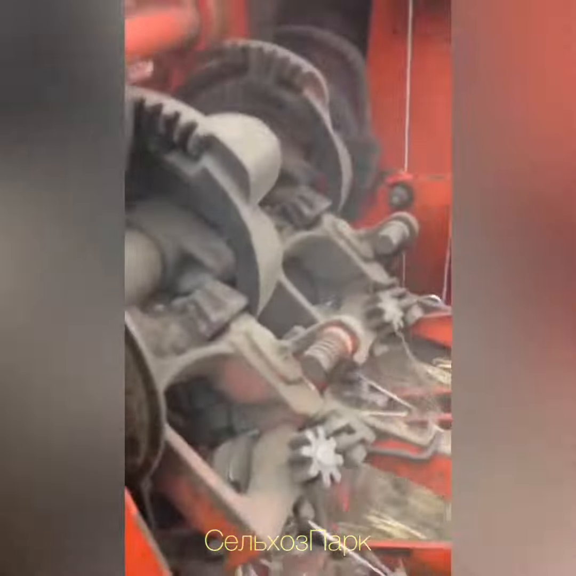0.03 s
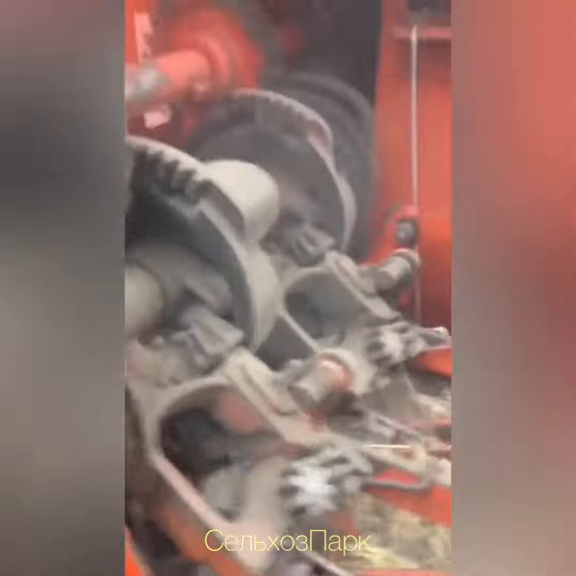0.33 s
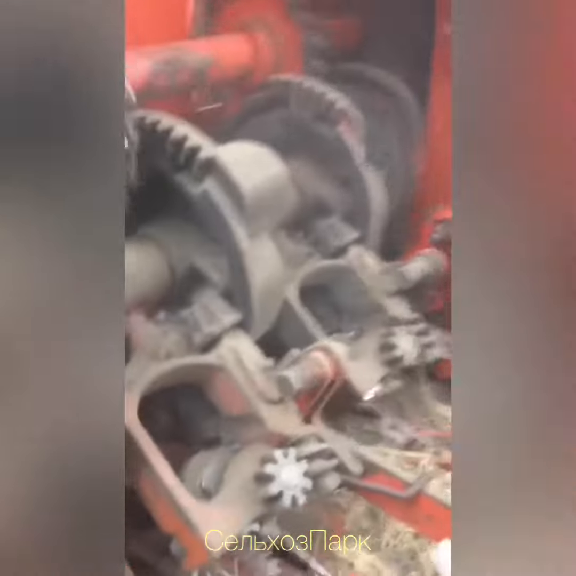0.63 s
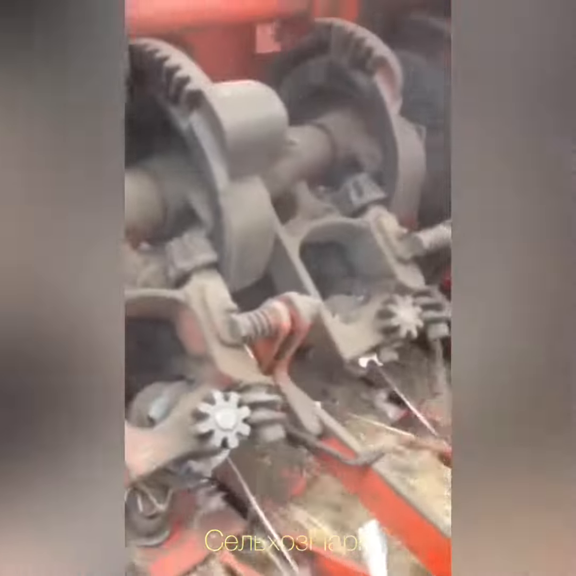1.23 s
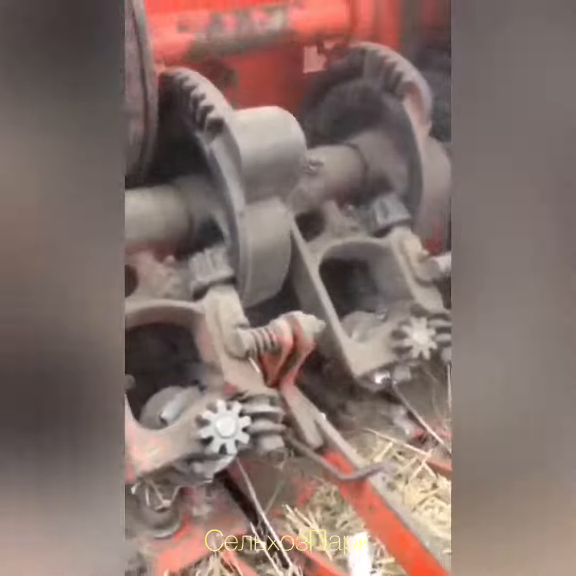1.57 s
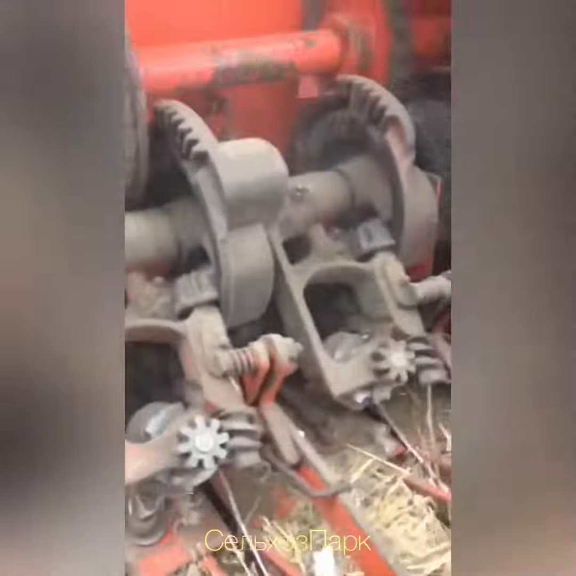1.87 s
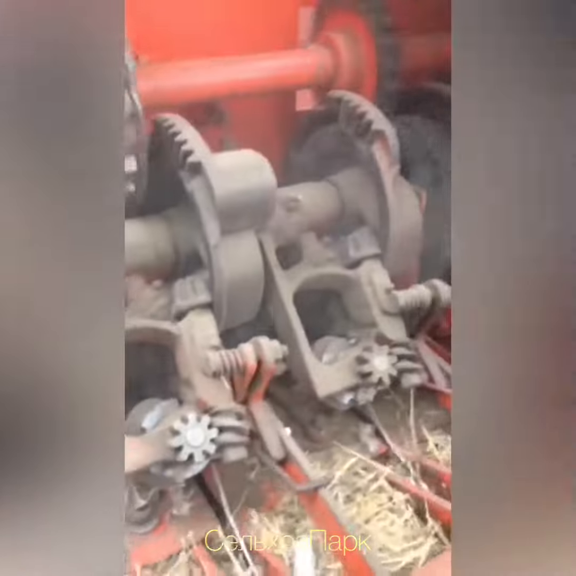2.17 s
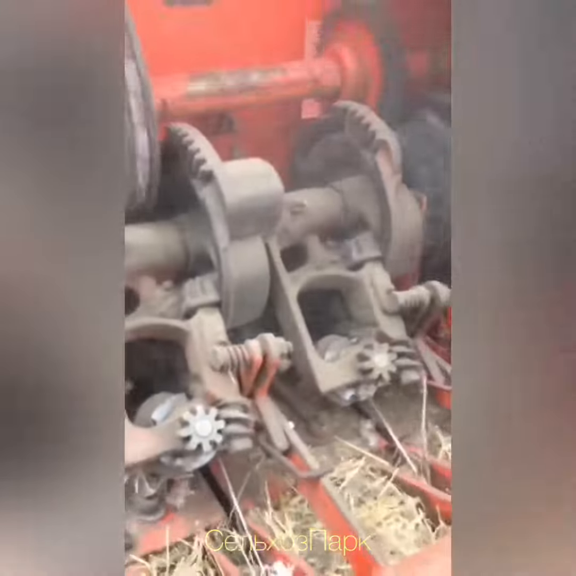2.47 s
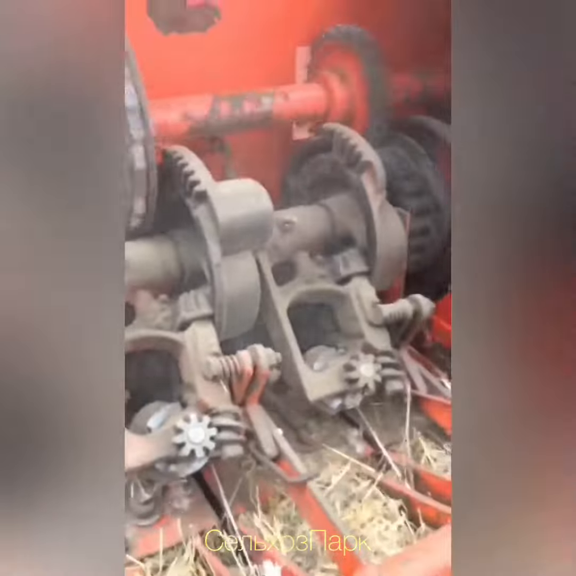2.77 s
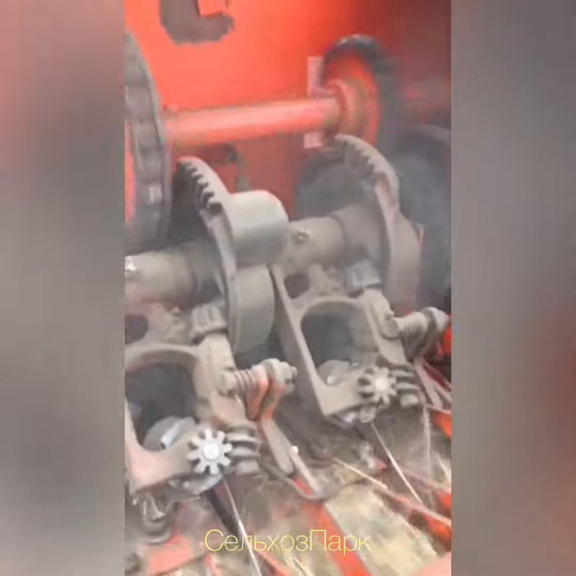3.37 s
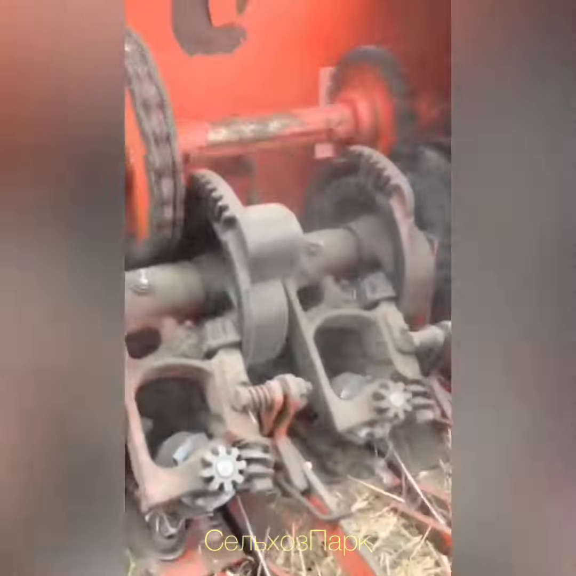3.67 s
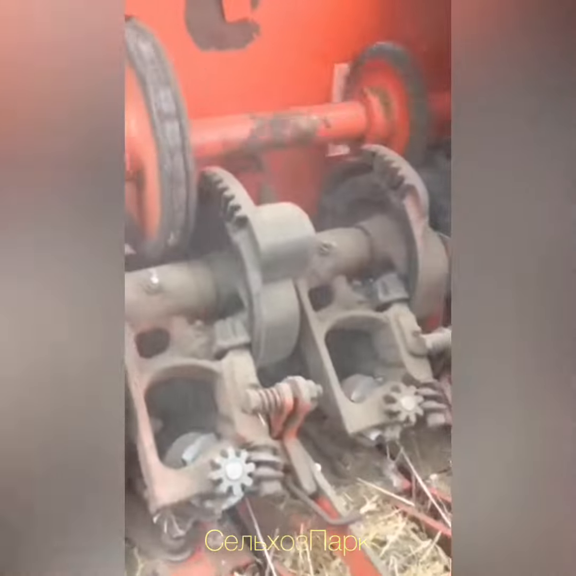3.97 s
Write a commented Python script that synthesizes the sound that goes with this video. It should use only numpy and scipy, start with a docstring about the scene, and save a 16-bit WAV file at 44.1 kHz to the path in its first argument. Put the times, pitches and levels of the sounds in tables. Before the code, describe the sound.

A hay baler runs steadily, with deep rhythmic thumping, rattling chains and sharp steel clacks.

```python
"""A hay baler running steadily in the open air, heard from one microphone close to its knotters.
Every turn of the crank brings two surges, the plunger's pressing stroke and its return: the sheet-steel
bale chamber booms and thumps, the frame rumbles, chains rattle and hay rustles over a deep shudder.
The plunger scrapes on its way back. Once a turn a steel part clacks home and chatters, the hardest
blows set an arm clanging, and now and then a small knotter part rings thinly."""
import sys
import numpy as np
from scipy import signal
from scipy.fft import rfft, irfft
from scipy.io import wavfile
from scipy.ndimage import uniform_filter1d

SR = 44100
rng = np.random.default_rng(int(sys.argv[2]) if len(sys.argv) > 2 else 0)


def unload_audio(sound):
    """Save the sound as a 16-bit wav file, at the path given as the first command line argument."""
    columns = np.transpose(np.atleast_2d(sound))
    # keep every value between -1 and 1, then stretch to whole-number steps
    steps = np.round(np.clip(columns, -1, 1) * 32767)
    wavfile.write(sys.argv[1], SR, steps.astype(np.int16))


N = 176400
T = np.arange(N) / SR
TURN_S, FIRST_TURN_S = 1.123, -.275
KNOCKS_PER_S, KNOCK_SPREAD_DB = 900, 2   # in both frame and chamber


def from_db(db):
    """Decibels to gain."""
    return 10 ** (np.asarray(db) / 20)


def rms_one(x):
    """Scale to rms 1."""
    return x / np.sqrt(np.mean(x ** 2) + 1e-20)


def colour(x, spectrum, tilt_db=0):
    """Shape a signal by a spectrum that falls away beyond its ends, tilted per octave; rms 1."""
    octave = np.log2(np.maximum(np.fft.rfftfreq(len(x), 1 / SR), 1))
    hz, db = np.transpose(spectrum)
    edges = np.log2(hz)
    inside = np.clip(octave, edges[0], edges[-1])
    gain = from_db(np.interp(octave, edges, db) + tilt_db * inside - 20 * abs(octave - inside))
    return rms_one(irfft(rfft(x) * gain, len(x)))


def drift(rate_hz):
    """A random wander, mostly slower than the rate; rms 1."""
    hz = np.fft.rfftfreq(N, 1 / SR)
    return rms_one(irfft(rfft(rng.standard_normal(N)) / (1 + (hz / rate_hz) ** 2) ** 2, N))


def steady(x, span_s):
    """Even out swells longer than the span."""
    window = max(int(span_s * SR), 2)
    return x / np.sqrt(uniform_filter1d(uniform_filter1d(x ** 2, window), window) + 1e-9)


def swells(rows, width_s):
    """Gain that rises and falls around each given moment."""
    return sum(from_db(db) / (1 + ((T - s) / width_s) ** 2) for s, db in rows)


def contacts(per_s, spread_db):
    """Random clicks of uneven size."""
    sizes = from_db(spread_db * np.minimum(rng.exponential(1, N), 4)) * rng.choice([-1, 1], N)
    return sizes * (rng.random(N) < per_s / SR)


def resonate(x, hz, width_hz):
    """Ring one resonance with a signal; rms 1."""
    r = np.exp(-np.pi * width_hz / SR)
    return rms_one(signal.lfilter([1, 0, -1], [1, -2 * r * np.cos(2 * np.pi * hz / SR), r * r], x + 1e-18))


def add(out, s, sound):
    """Mix a sound in at its time."""
    i = max(int(s * SR), 0)
    out[i:i + len(sound)] += sound[:N - i]


# The machine's effort, changing with the hay each stroke takes in: time_s, lift_db
EFFORT = [(0, 1.5), (.12, 1), (.3, 0), (.6, 1), (.76, 0), (1.0, 0), (1.3, 1.5), (1.62, 0), (1.85, -1),
          (2.1, -0.5), (2.33, -2), (2.55, -.5), (2.87, -0.7), (3.2, -1.5), (3.42, 2.5), (3.65, 0),
          (4, -0.5)]

def each_turn(rows):
    """A level curve in dB, repeated with every turn of the crank and lifted by the effort."""
    s, db = np.transpose(rows)
    return np.interp(T - FIRST_TURN_S, s, db, period=TURN_S) + np.interp(T, *np.transpose(EFFORT))


# Shudders of the whole machine: centre_s, level_db
SHUDDERS = [(.03, -22), (.31, -22.5), (.63, -24), (1.05, -28.5), (1.37, -24), (1.47, -21.5), (2.25, -28.5),
            (2.61, -22), (3.18, -27), (3.36, -23), (3.64, -26.5), (3.755, -19)]
# Their deep spectrum: freq_hz, relative_db
SHUDDER_SPECTRUM = [(20, -26), (35, -13), (55, -8), (80, 0), (105, 6), (135, -3), (200, -43)]

def shudder(floor_db=-33):
    """The whole machine shakes as the plunger's mass turns round."""
    gain = np.hypot(from_db(floor_db), swells(SHUDDERS, width_s=0.048))
    return gain * steady(colour(rng.standard_normal(N), SHUDDER_SPECTRUM), span_s=0.014)


# Rise and fall of the hay, faint under the machinery: time_s, relative_db
RUSTLE_LEVEL = [(0, -32.5), (.13, -42), (.21, -34.5), (.42, -37), (.79, -41.5), (.9, -38), (1.22, -37.5),
                (1.48, -37.5), (1.66, -41.5), (1.87, -45), (2.1, -37.5), (2.36, -42), (2.48, -44.5),
                (2.64, -37), (2.82, -43), (2.99, -39), (3.33, -35.5), (3.49, -40), (3.62, -42), (3.82, -35),
                (4, -40.5)]
# Spectrum of the dry stalks: freq_hz, relative_db
RUSTLE_SPECTRUM = [(2500, 3), (4500, 4), (6500, -1.5), (8500, -2.5), (10500, -9.5)]

def hay(gain_db=-3.5, tick_db=-10, flicker_db=2, load_share=0.19):
    """Dry stalks rustle as they are pushed through, and some tick against the steel."""
    load_db = each_turn(RATTLE_LEVEL)   # the hay partly follows the load on the chains
    level_db = np.interp(T, *np.transpose(RUSTLE_LEVEL)) + load_share * (load_db - load_db.mean())
    flicker = from_db(flicker_db * drift(rate_hz=36))
    rustle = flicker * colour(contacts(per_s=9000, spread_db=0.5), RUSTLE_SPECTRUM)
    ticks = sum(resonate(contacts(per_s=10, spread_db=-1), hz, width_hz=400) / hz
                for hz in np.geomspace(4000, 9500, 10))
    return from_db(gain_db + level_db) * (rustle + from_db(tick_db) * rms_one(ticks))


# Scrapes of the returning plunger: centre_s, level_db
SCRAPES = [(.485, -32), (1.47, -21.5), (2.66, -25.5), (3.724, -21)]
# Spectrum of their grit: freq_hz, relative_db
SCRAPE_SPECTRUM = [(500, -8), (1100, 6.5), (2000, -5.5), (2800, -2), (3400, -0.5), (4500, -15.5),
                   (10000, -27)]

def plunger_scrapes():
    """The plunger scrapes on each return stroke in a short gritty swell."""
    return swells(SCRAPES, width_s=0.013) * colour(contacts(per_s=5000, spread_db=2.0), SCRAPE_SPECTRUM)


# The chains' rattle through one turn: time_in_turn_s, relative_db
RATTLE_LEVEL = [(0.02, -25.5), (0.12, -26), (0.25, -27), (0.32, -30), (0.4, -34.5), (0.5, -28.5),
                (0.62, -24), (0.72, -26.5), (0.82, -32), (0.94, -31), (1.1, -33)]
# Spectrum of links and gear teeth: freq_hz, relative_db
RATTLE_SPECTRUM = [(600, -10), (950, 5), (1300, 1.5), (1700, -2.5), (2150, -3), (2490, -4.5), (2580, -16.5),
                   (2850, -7.5), (3300, -9), (3850, -11), (4400, -16.5), (7000, -22.5)]
# Notes of the loose guards and links: pitch_hz, relative_db
LOOSE_PARTS = [(1027, -6), (1250, -1), (1451, 2), (1540, -2), (1727, -3), (1822, 3), (2065, -1), (2296, 1),
               (2630, -1.5), (2490, 2), (2814, -2.5), (3250, -4), (3720, -7)]

def chains(link_db=-2, clink_db=-6.5, link_t60_s=0.028):
    """Chain links and gear teeth rattle with the load, and loose parts clink on their own notes."""
    hits = contacts(per_s=1900, spread_db=-0.5)
    energy_kept = from_db(-120 / (link_t60_s * SR))   # per sample
    energy = signal.lfilter([1], [1, -energy_kept], hits ** 2)
    links = colour(np.sqrt(energy) * rng.standard_normal(N), RATTLE_SPECTRUM)
    clinks = sum(from_db(db) * resonate(contacts(per_s=60, spread_db=3.5), hz, width_hz=40)
                 for hz, db in LOOSE_PARTS)
    rattle = from_db(link_db) * links + from_db(clink_db) * rms_one(clinks)
    return from_db(each_turn(RATTLE_LEVEL)) * rattle


# Thin pings of small knotter parts, close to the microphone: start_s, level_db, pitch_hz, t60_s
KNOTTER_PINGS = [(1.168, -28.5, 7378, .12), (1.174, -40, 10050, .08), (1.178, -31, 4705, .13),
                 (1.18, -36, 6169, .13), (1.183, -30.5, 8231, .11), (1.188, -32, 7480, .09),
                 (1.304, -30, 8620, .07), (2.27, -31, 4800, .08), (3.381, -35, 8260, .07)]
# Clangs of one steel arm under the hardest clacks: start_s, level_db, pitch_hz, t60_s
ARM_CLANGS = [(1.029, -14, 2365, .07), (1.041, -14.5, 1583, .11), (2.146, -19, 1954, .1),
              (3.259, -17, 2450, .09), (3.274, -14, 2405, .1), (3.276, -20, 1620, .16)]

def steel_rings(rows, attack_s=.004, chatter_db=2.5):
    """Steel parts ring briefly on one note and chatter as they do."""
    out, t = np.zeros(N), T[:SR // 4]
    for s, db, hz, t60 in rows:
        envelope = np.minimum(t / attack_s, 1) * from_db(db - 60 * t / t60)
        add(out, s, envelope * np.sin(2 * np.pi * hz * t))
    return out * from_db(chatter_db * drift(rate_hz=720))


# Steel clacking home, at close range: start_s, level_db, brightness_db_per_octave, burst_t60_s
CLACKS = [(0.066, -29.5, 6, 0.077), (.133, -31.5, -9, 0.04), (0.197, -25, -5.5, 0.049),
          (0.522, -26, -5.5, 0.06), (0.606, -28.5, 1, 0.094), (0.855, -29, 0.5, 0.11),
          (0.871, -30, 1.5, 0.23), (1.014, -18, 4, 0.03), (1.027, -18, -2.5, 0.06),
          (1.044, -22.5, -1, 0.16), (1.1093, -26, -3.5, .1), (1.1706, -33.5, 6, 0.13),
          (1.292, -24.5, -9, 0.082), (1.3068, -27, -3, 0.12), (1.9802, -31, 1, 0.074),
          (2.124, -27, 3, 0.037), (2.1314, -17.5, -0.5, 0.064), (2.149, -20, -1.5, 0.059),
          (2.233, -23, -5, 0.17), (2.2677, -30, 1.5, 0.13), (2.413, -20, -4.5, 0.056),
          (2.922, -33, -7, 0.18), (2.998, -29, -1.5, 0.15), (3.25, -26, -1, .08), (3.259, -19.5, 2, 0.054),
          (3.275, -22.5, 2.5, 0.13), (3.374, -28, 5, 0.21), (3.395, -23.5, -4, 0.15),
          (3.5337, -27, -3, 0.088), (3.552, -30.5, 1, 0.068)]
# Spectrum of a clack's burst: freq_hz, relative_db
CLACK_SPECTRUM = [(300, -20), (900, -2), (1600, 3), (2500, -2.5), (2900, 0), (4000, 0.5), (5000, -3.5),
                  (6000, -8.5), (8500, -12.5), (11000, -19)]
# Modes of the struck steel: pitch_hz, relative_db, t60_s
STEEL_MODES = [(980, -11, .09), (1308, 5, 0.072), (1522, -10, 0.14), (1660, 0.5, 0.18), (2416, 3, 0.15),
               (2535, -3, 0.17), (3440, -14, .07), (3990, 2, 0.071), (4190, -5, 0.057), (4840, -7, 0.049),
               (5700, -3, 0.045)]

def clacks(attack_s=0.0047, ring_db=-12, spread_db=2.5, detune=.02):
    """Each clack is a dying burst of touches that rings the steel's modes, never twice quite alike."""
    out, t = np.zeros(N), T[:SR // 4]
    touches = rms_one(contacts(per_s=2500, spread_db=-2.0)) + rng.standard_normal(N)
    hz, mode_db, mode_t60 = np.transpose(STEEL_MODES)[:, :, None]
    octave = np.log2(hz) - np.log2(hz).mean()
    for s, db, bright_db, t60 in CLACKS:
        burst = colour(np.roll(touches, rng.integers(N))[:len(t)], CLACK_SPECTRUM, bright_db)
        burst *= from_db(-60 * np.maximum(t - attack_s, 0) / t60)
        struck_db = ring_db + mode_db + bright_db * octave + spread_db * rng.standard_normal(hz.shape)
        struck_hz = hz * (1 + detune * rng.standard_normal(hz.shape))
        phase = 2 * np.pi * (struck_hz * t + rng.random(hz.shape))
        modes = from_db(struck_db - 60 * t / mode_t60) * np.sin(phase)
        add(out, s, from_db(db) * np.minimum(t / attack_s, 1) * (burst + modes.sum(axis=0)))
    return out


# The frame's rumble through one turn: time_in_turn_s, relative_db
RUMBLE_LEVEL = [(0.02, -18.5), (0.12, -15.5), (0.23, -19.5), (0.31, -23.5), (0.41, -31.5), (0.47, -22),
                (0.58, -16), (0.7, -18), (0.82, -22), (0.93, -26.5), (1.03, -26.5), (1.1, -24.5)]
# Spectrum of the rollers on the frame: freq_hz, relative_db
RUMBLE_SPECTRUM = [(170, -27), (240, -7), (295, 2.5), (385, -1), (430, -5.5), (490, -6), (570, -11),
                   (635, -7.5), (710, -10), (800, -13), (950, -26.5), (1400, -36)]
# Modes of the frame: pitch_hz, width_hz, relative_db
FRAME_MODES = [(309, 30, -11.5), (343.4, 21, -10), (382.5, 12, -2.5), (444, 10, -5.5), (538.3, 15, -4.5),
               (617.5, 30, -3.5), (712.4, 4.2, -7.5), (908, 22, -9)]
# The rollers' hardest knocks: start_s, level_db
HARD_KNOCKS = [(0.026, -23), (.322, -13), (1.484, -17), (2.095, -11), (2.545, -16), (3.665, -14)]

def frame(gain_db=-1.5, ring_db=-6, knock_attack_s=0.0026, knock_t60_s=0.18):
    """The plunger's rollers knock along the frame and set its modes ringing; a few knocks stand out."""
    rumble = steady(colour(contacts(KNOCKS_PER_S, KNOCK_SPREAD_DB), RUMBLE_SPECTRUM), span_s=0.04)
    modes = sum(from_db(db) * resonate(contacts(per_s=90, spread_db=4), hz, width)
                for hz, width, db in FRAME_MODES)
    accents = np.zeros(N)
    for s, db in HARD_KNOCKS:
        add(accents, s, np.minimum(T / knock_attack_s, 1) * from_db(db - 60 * T / knock_t60_s))
    level = from_db(gain_db + each_turn(RUMBLE_LEVEL))
    return np.hypot(level, accents) * rumble + from_db(ring_db) * level * steady(modes, span_s=0.038)


# Heavy thumps on the chamber walls and guards: start_s, level_db, pitch_hz, push_s
THUMPS = [(0.013, -4.5, 164, 0.007), (0.207, -6, 165, 0.033), (.262, -3.5, 185, 0.022),
          (0.365, -2, 187, 0.0055), (.85, -4.5, 189, 0.018), (.902, -1, 191, 0.056),
          (1.034, -4, 159, 0.019), (1.07, -3.5, 158, 0.012), (1.328, -8, 150, 0.017),
          (1.372, -4.5, 149, 0.0086), (1.392, -10.5, 385, 0.027), (1.453, -9, 137, 0.036),
          (1.483, -15.5, 644, .018), (1.8, -21.5, 621, 0.013), (1.974, -8.5, 185.6, 0.035),
          (2.092, -17, 662, 0.01), (2.099, -6, 180, 0.032), (2.148, -4.5, 160.5, 0.019),
          (2.215, -14, 138.5, 0.036), (2.492, -3, 165.7, 0.0059), (2.54, -11.5, 362, 0.014),
          (2.68, -18, 304, 0.022), (3.137, 0, 193, 0.01), (3.178, -3, 181, 0.0053),
          (3.216, -10, 190, 0.024), (3.28, -2.5, 153, 0.013), (3.335, -5, 159, 0.016),
          (3.55, -6.5, 149, 0.01), (3.644, -3.5, 190, 0.013)]

def wall_thumps(attack_s=0.0078, t60_s=0.089, sag_per_s=0.22):
    """A heavy push swings a wall, whose pitch sags as the swing dies; gives sound and envelope."""
    out, envelope, t = np.zeros(N), np.zeros(N), T[:SR // 4]
    for s, db, hz, push_s in THUMPS:
        swing = np.minimum(t / attack_s, 1) * from_db(db - 60 * np.maximum(t - push_s, 0) / t60_s)
        add(out, s, swing * np.sin(2 * np.pi * hz * t * (1 - sag_per_s * t / 2)))
        add(envelope, s, swing)
    return out, envelope


# The chamber's boom at the microphone through one turn: time_in_turn_s, level_db
BOOM_LEVEL = [(.02, -22.5), (.07, -13.5), (.2, -15.5), (.29, -17.5), (.39, -26.5), (.48, -18), (.55, -15),
              (.65, -16), (.76, -18), (.92, -25), (1.08, -19)]
# Modes of its sheet-steel walls: pitch_hz, width_hz, relative_db
WALL_MODES = [(127.6, 5.5, -1.5), (143, 20.5, -0.5), (155.3, 25, -0.5), (190.1, 26.6, 3), (221, 38, -6.5)]

def bale_chamber(band_hz=(95, 290), half_power_db=-7):
    """Dense knocks keep the chamber walls booming; under a heavy push one clear thump takes over."""
    walls = sum(from_db(db) * resonate(contacts(KNOCKS_PER_S, KNOCK_SPREAD_DB), hz, width)
                for hz, width, db in WALL_MODES)
    walls = signal.sosfilt(signal.butter(2, band_hz, "band", fs=SR, output="sos"), walls)
    boom = from_db(each_turn(BOOM_LEVEL)) * steady(walls, span_s=0.035)
    thumps, push = wall_thumps()
    damping = np.hypot(1, push / from_db(half_power_db))   # a push damps the small knocks
    return thumps + boom / damping


def scene():
    """The whole baler in mono, from close beside the knotters in the open air."""
    running = bale_chamber() + shudder() + frame() + chains() + hay()
    steel = clacks() + steel_rings(ARM_CLANGS) + steel_rings(KNOTTER_PINGS)
    return (running + steel + plunger_scrapes())[None]


def record(dry, ceiling=.96, cutoff_hz=10700):
    """The microphone's signal has its highest peaks rounded and its top treble cut."""
    rounded = dry / (1 + (dry / ceiling) ** 6) ** (1 / 6)
    return signal.sosfilt(signal.ellip(12, .1, 90, cutoff_hz, fs=SR, output="sos"), rounded)


dry = scene()
out = record(dry)
unload_audio(out)
```